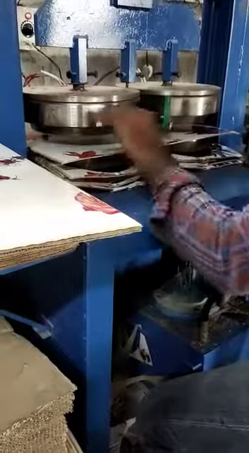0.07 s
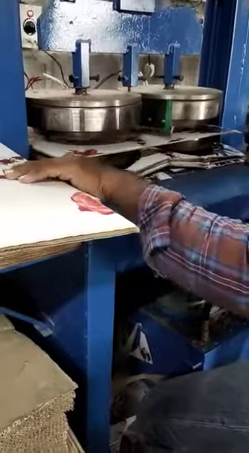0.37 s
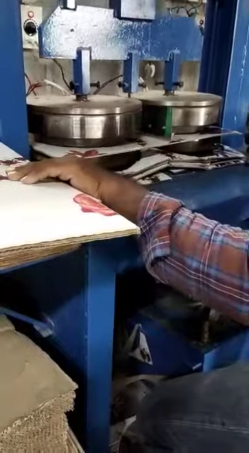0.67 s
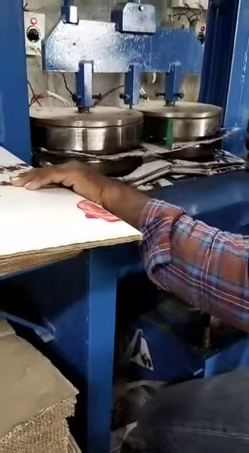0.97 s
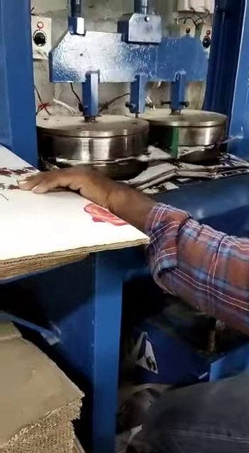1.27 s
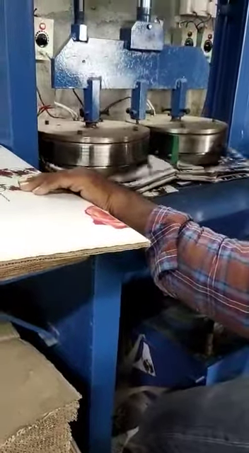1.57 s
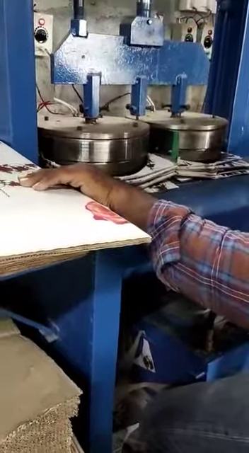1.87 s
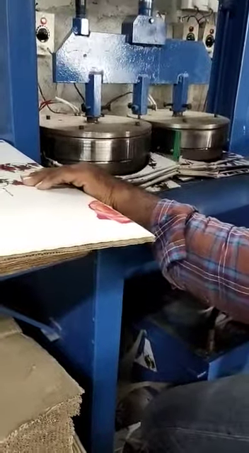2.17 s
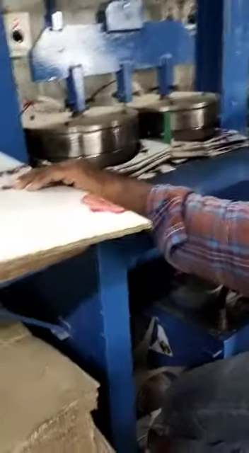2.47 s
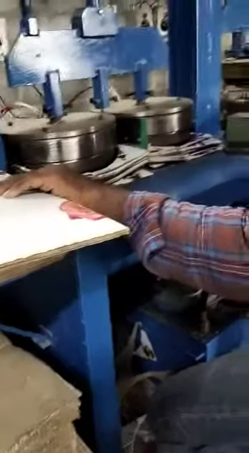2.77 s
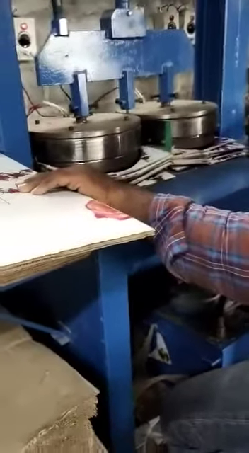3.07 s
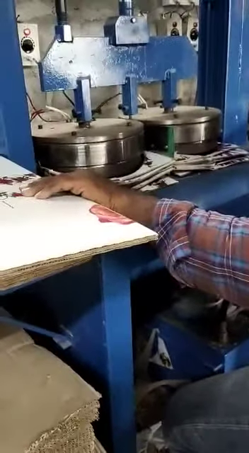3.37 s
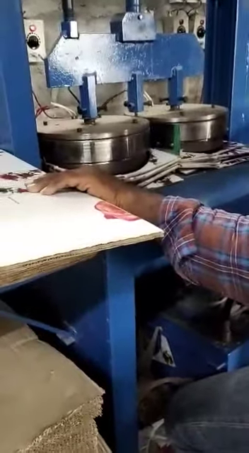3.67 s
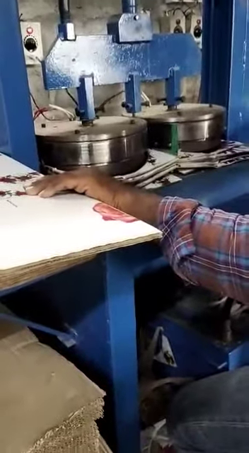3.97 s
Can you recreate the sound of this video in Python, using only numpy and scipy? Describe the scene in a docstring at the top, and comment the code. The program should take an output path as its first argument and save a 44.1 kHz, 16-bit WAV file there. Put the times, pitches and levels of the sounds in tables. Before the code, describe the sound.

A hydraulic press hums and whines close by in a small workshop. It starts with a soft knock and hissing oil, which stops with a faint chirp at 0.8 seconds. Paper crackles and crunches, with a thin squeak around 1.1 seconds. At about 1.5 seconds the steel dies close in a loud, rattling, ringing clunk. The pump dips, then hums on more quietly, with one sharp tick near 2.5 seconds.

```python
"""A small workshop with a hydraulic paper-plate press. The vane pump hums and whines at harmonics
of its shaft rate. The valve opens with a soft knock, oil sings through it while the ram descends,
and it shuts with a chirp. The dies crush the paper with crackles and a thin stick-slip squeak.
The press bottoms out in a rattling clunk that rings the frame's modes and drags the motor down;
the pump runs on more quietly, and one sharp tick follows."""
import sys
import numpy as np
from scipy import signal
from scipy.fft import irfft
from scipy.io import wavfile

SR = 44100
rng = np.random.default_rng(int(sys.argv[2]) if len(sys.argv) > 2 else 0)


def store_pcm(level_fs):
    """Save levels as 16-bit WAV."""
    pcm = np.round(np.clip(level_fs, -1, 1) * 32767).astype(np.int16)
    wavfile.write(sys.argv[1], SR, np.atleast_2d(pcm).T)


N = 176400
T = np.arange(N) / SR
VANES = 8  # pump pulses per turn of the shaft
COHERENT_BELOW_HZ = 500

def from_db(db):
    """Amplitude grows tenfold for every 20 dB."""
    return 10 ** (np.asarray(db) / 20)

def unit_rms(x):
    """Normalisation to unit mean power."""
    return x / np.sqrt(np.mean(x ** 2) + 1e-20)

def curve(rows):
    """Linear interpolation between (time_s, value) points."""
    return np.interp(T, *np.transpose(rows))

def pan(db):
    """Interaural level difference: a positive balance favours the left ear."""
    return from_db(np.array([[.5], [-.5]]) * db)

def drift(rate, axis=T):
    """Random modulation: Gaussian values joined by lines, `rate` of them per unit of the axis."""
    knots = rng.standard_normal(4096)
    return np.interp(axis * rate, np.arange(len(knots)), knots)

def band(x, low_hz, high_hz):
    """Butterworth band-pass filtering."""
    edges_hz = [low_hz, min(high_hz, SR / 2 - 1000)]
    return signal.sosfilt(signal.butter(2, edges_hz, "band", fs=SR, output="sos"), x + 1e-18)

def stereo_noise(hz, size=N):
    """Interaural coherence: the ears receive alike noise in the bass, unrelated noise in the treble."""
    coherence = 1 / (1 + (hz / COHERENT_BELOW_HZ) ** 2)
    common = np.sqrt(coherence) * rng.standard_normal(size)
    return common + np.sqrt(1 - coherence) * rng.standard_normal((2, size))

def shaped_noise(spectrum, ripple_db=2, ripple_spacing_hz=44.83):
    """Spectral shaping: noise of unit rms, coloured by narrow resonances of the steelwork."""
    hz = np.maximum(np.fft.rfftfreq(N, 1 / SR), 1)
    points_hz, density_db, balance_db = np.transpose(spectrum)
    white = stereo_noise(hz, len(hz)) + 1j * stereo_noise(hz, len(hz))
    ripple = ripple_db * drift(1 / ripple_spacing_hz, hz) * np.minimum(hz / 2500, 1)
    gain = from_db(np.interp(np.log(hz), np.log(points_hz), density_db) + ripple)
    sides = pan(np.interp(np.log(hz), np.log(points_hz), balance_db))
    bass_rolloff = np.minimum(hz / points_hz[0], 1)
    return unit_rms(irfft(white * gain * sides * bass_rolloff, N))

def impulses(times_s, levels_db):
    """Impulsive excitation: one sample per event."""
    out = np.zeros(N)
    out[(np.asarray(times_s) * SR).astype(int)] = from_db(levels_db)
    return out

def harmonics(angle, rows, waver_db, waver_per_s, lead_rad):
    """Wavering shaft harmonics, each multiple rounded to a whole number; the left ear leads in phase."""
    out = 0
    for multiple, db, balance_db in rows:
        amplitude = np.sqrt(2) * from_db(db + waver_db * drift(waver_per_s)) * pan(balance_db)
        lead = np.array([[lead_rad], [0]]) * min(multiple / VANES / 4, 1)
        out = out + amplitude * np.sin(np.round(multiple) * angle + rng.uniform(0, 2 * np.pi) + lead)
    return out

# Spectrum of the room: frequency_hz, relative_density_db, balance_db
ROOM_SPECTRUM = [(30, -22, 0), (62, -14, 0), (100, -2, 0), (240, 0, 0), (500, -2, 1), (900, -7, 0),
                 (1500, -8, -1), (2300, -8, 0), (4200, -16, 0), (6500, -13, 0), (7900, -9, -3),
                 (9500, -18, 0), (12000, -28, 10), (15000, -42, 10)]
def workshop():
    """Ambient noise: a broadband rumble and hiss whose level wavers slightly."""
    return from_db(-43 + 1.8 * drift(11)) * shaped_noise(ROOM_SPECTRUM)

# Vane-passing frequency, sagging at the clunk: time_s, pitch_hz
VANE_RATE = [(0, 198.95), (.9, 199), (1.4, 198.7), (1.53, 197.7), (1.65, 194), (1.73, 194.5), (1.86, 199),
             (2.2, 199.2), (4, 199.27)]
def shaft_angle():
    """Phase is the integral of frequency: the shaft's angle in radians as the motor slows under load."""
    vane_hz = curve(VANE_RATE) * (1 + 0.00043 * drift(25.4))
    return 2 * np.pi * np.cumsum(vane_hz) / VANES / SR

# Envelope of the hum's fundamental: time_s, level_db
HUM_ENVELOPE = [(0, -21.5), (.2, -20), (.92, -20), (1.1, -16.8), (1.17, -17.3), (1.24, -19.5), (1.33, -17),
                (1.53, -18.5), (1.6, -26.5), (1.8, -30), (2.08, -24.3), (2.4, -25.5), (4, -24.7)]
# Other partials of the hum: shaft_multiple, level_db, balance_db
HUM_PARTIALS = [(4, -66.5, -3), (12.06, -55, -1), (16.09, -41.5, -1), (24, -53.5, 9.5), (32.2, -64, -21),
                (40.2, -59.5, -2), (48, -66.5, -24), (55.32, -63.5, 14), (62.8, -62.5, -5), (75, -82, -6)]
def pump_hum(angle):
    """Periodic forcing: one pressure pulse per vane sets the fundamental."""
    fundamental = np.sqrt(2) * from_db(curve(HUM_ENVELOPE) + 0.18 * drift(59)) * np.sin(VANES * angle)
    return fundamental + harmonics(angle, HUM_PARTIALS, waver_db=0.76, waver_per_s=13, lead_rad=0.49)

# Envelope of the whine and hiss: time_s, gain_db
WHINE_ENVELOPE = [(0, 8.5), (1.0, 9.5), (1.5, 8), (1.62, 3), (1.8, 1.5), (2.05, 3), (2.55, 3), (2.85, -1.5),
                  (4, 0)]
# Partials of the pump casing: shaft_multiple
CASING_MULTIPLES = [90, 94, 96, 97, 102, 104, 127, 261, 281]
# Strength of each of those partials: relative_level_db
CASING_LEVELS = [-62.5, -64, -52, -63.5, -63, -57, -67.5, -64.5, -68]
# Spectrum of the pump's hiss: frequency_hz, relative_density_db, balance_db
HISS_SPECTRUM = [(1110, -5, -2), (1960, -3.5, 9), (2420, 1, 8), (3170, -8.5, 6), (4700, -29, 0),
                 (7300, -13.5, 14), (9200, -16, 5), (11400, -36, 43), (14300, -35, -2.5)]
# Spectrum of its high fizz: frequency_hz, relative_density_db, balance_db
FIZZ_SPECTRUM = [(3550, -38, 3.4), (5120, -22, 9.9), (5770, -6.5, 35), (5920, 3, 18), (6160, -6.5, 19),
                 (6300, -0.5, 25), (6720, -6.5, 14), (6945, 5, 27), (7080, -15, 6.5), (9100, -26, 9.3),
                 (12300, -25.5, 40), (13000, -51.5, 9.9)]
def pump_whine(angle):
    """Forced vibration: the casing sounds high harmonics while the rotation modulates hiss and fizz."""
    envelope_db = curve(WHINE_ENVELOPE)
    partials = [(multiple, db, 11) for multiple, db in zip(CASING_MULTIPLES, CASING_LEVELS)]  # leftward
    casing = harmonics(angle, partials, waver_db=1.05, waver_per_s=9.3, lead_rad=1.0)
    pulsing = 1 + .33 * np.cos(VANES * angle) + .1 * np.cos(angle)
    hiss = from_db(-50) * shaped_noise(HISS_SPECTRUM) * pulsing
    flutter = 1 + 0.12 * np.cos(2 * angle) + 0.14 * np.cos(7 * angle)
    fizz = from_db(-46.5 + 0.41 * envelope_db) * shaped_noise(FIZZ_SPECTRUM) * flutter
    return from_db(envelope_db) * (casing + hiss) + fizz

# Knock of the opening valve: peak_s, width_s, low_hz, high_hz, level_db
VALVE_KNOCK = (.033, 0.09, 780, 1450, -32)
def valve_knock():
    """A band-limited transient: the valve opens with a soft, dull burst of noise that quickly fades."""
    peak_s, width_s, low_hz, high_hz, db = VALVE_KNOCK
    envelope = from_db(db) * np.exp(-((T - peak_s) / width_s) ** 2)
    return envelope * unit_rms(band(stereo_noise(low_hz), low_hz, high_hz))

# Spectrum of the rushing oil: frequency_hz, relative_density_db, balance_db
OIL_SPECTRUM = [(100, -8, 0), (300, -2, 3), (795, -8.5, 23), (1600, 1.5, 4), (2170, -2, 7),
                (3140, -1, -1.5), (4950, 0, 0), (6040, -2.5, 13), (8100, 2, -4), (10300, -8.5, 7),
                (13000, -13.5, 8), (15500, -20, -5)]
# Tones of the oil in the valve: shaft_multiple, level_db, balance_db
OIL_PARTIALS = [(32, -49, -3), (40.05, -40, -5), (48, -47.5, -13), (56.54, -38, -9), (64.6, -49, 0),
                (81.5, -50, 0), (111.7, -45.5, 5.5), (144, -50.5, 4), (160.4, -53, 4), (225, -50, 2)]
# Brief whistle early in the stroke: shaft_multiple, level_db, balance_db
OIL_WHISTLE = [(112, -38.5, 4)]
def valve_flow(angle, opens_s=0.0067, shuts_s=0.826, fade_s=0.046, whistle_s=.18, whistle_width_s=0.12):
    """Flow noise: oil rushes and sings in time with the pump while the ram descends."""
    opening = np.clip((T - opens_s) / fade_s, 0, 1)
    flowing = np.clip(1 - (T - shuts_s) / fade_s, 0, 1)
    rush = from_db(-34.5) * shaped_noise(OIL_SPECTRUM) * (1 + 0.089 * np.cos(VANES * angle))
    singing = harmonics(angle, OIL_PARTIALS, waver_db=2.7, waver_per_s=21.8, lead_rad=1.64)
    whistle = harmonics(angle, OIL_WHISTLE, waver_db=1.5, waver_per_s=33.4, lead_rad=.7)
    swell = np.exp(-((T - whistle_s) / whistle_width_s) ** 2)
    return flowing * (rush + opening * singing + swell * whistle)

# Spectrum of the crushed paper: frequency_hz, relative_density_db, balance_db
CRUNCH_SPECTRUM = [(40, -15, 0), (200, 0, 0), (330, 1.5, 0), (510, 3, 0), (650, -10.5, 0), (1500, -15, 0),
                   (2800, -13.5, 0.48), (4600, -22.5, 0.22), (8100, -14, 0.64), (10900, -22, 1),
                   (15000, -28, 2)]
# Single snaps of the paper: start_s, relative_level_db
PAPER_SNAPS = [(.8855, -21), (1.0543, -17), (1.066, -16.5), (1.167, -18.5), (1.2095, -16.5),
               (1.4203, -21.5), (1.478, -24), (1.519, -23)]
def paper(crunch_s=1.19, crunch_width_s=0.061, crackle_s=0.92, crackle_width_s=0.33, peak_per_s=300):
    """Buckling: sheets fold between the dies with Poisson crackle, a few snaps and a swelling crunch."""
    swell = np.exp(-abs(T - crunch_s) / crunch_width_s)
    crunch = from_db(-27.5 + 2.8 * drift(130)) * swell * shaped_noise(CRUNCH_SPECTRUM)
    crackles_per_s = peak_per_s * np.exp(-((T - crackle_s) / crackle_width_s) ** 2)
    buckles = rng.random(N) < crackles_per_s / SR
    strengths = from_db(-33.5 + 2.3 * np.minimum(rng.exponential(1, N), 3))
    cracks = buckles * strengths + impulses(*np.transpose(PAPER_SNAPS))
    t = T[:SR // 10]
    decay = np.exp(-t / 0.0011) + 0.14 * np.exp(-t / 0.045)
    response = band(rng.standard_normal((2, len(t))), 5700, 10300) * decay
    return crunch + signal.fftconvolve(cracks[None], response)[:, :N] * pan(2.9)

def stick_slip(rows, waver_hz, waver_per_s):
    """Friction-driven oscillation: short tones, unsteady in pitch and level."""
    out = 0
    for start_s, length_s, hz, db in rows:
        swell = np.sqrt(np.sin(np.pi * np.clip((T - start_s) / length_s, 0, 1)).clip(0))
        amplitude = from_db(db + 2.2 * drift(waver_per_s)) * swell
        pitch_hz = hz + waver_hz * drift(waver_per_s)
        out = out + amplitude * np.sin(2 * np.pi * np.cumsum(pitch_hz) / SR)
    return out

# Chirps of the closing valve: start_s, length_s, pitch_hz, level_db
VALVE_CHIRPS = [(.818, .024, 800, -42), (.836, .038, 1005, -40)]
def valve_chirps():
    """Stick-slip friction: the valve chirps twice as it shuts."""
    return stick_slip(VALVE_CHIRPS, waver_hz=22, waver_per_s=260)

# Squeaks of the die: start_s, length_s, pitch_hz, level_db
DIE_SQUEAKS = [(.974, .014, 12000, -41), (1.097, .016, 12160, -26.5), (1.112, 0.022, 12000, -28.5),
               (1.13, .05, 12020, -41.5)]
def die_squeaks():
    """Stick-slip friction: the sliding die squeaks thinly on the left."""
    return stick_slip(DIE_SQUEAKS, waver_hz=110, waver_per_s=450) * pan(15)

def ring_envelope(blows, hz, t60_s, crack, crack_s, build_cycles=0.81):
    """Incoherent addition: each blow builds up, cracks and decays, and their energies sum."""
    t = T[:SR]
    build_up = 1 - np.exp(-t * hz / build_cycles)
    one_blow = from_db(-60 * t / t60_s) * build_up * (1 + crack * np.exp(-t / crack_s))
    energy = np.zeros(N)
    for start_s, db in blows:
        energy[int(start_s * SR):][:SR] += (from_db(db) * one_blow) ** 2
    return np.sqrt(energy)

def dense_modes(blows, rows, crack, crack_s, edge_ratio=1.243):
    """Modal overlap: modes too close to tell apart ring as bands of decaying noise."""
    out = 0
    for hz, db, t60_s in rows:
        noise = unit_rms(band(stereo_noise(hz), hz / edge_ratio, hz * edge_ratio))
        out = out + from_db(db) * noise * ring_envelope(blows, hz, t60_s, crack, crack_s)
    return out

# Noise bands of the first contact: low_hz, high_hz, level_db, t60_s
CLANK_BANDS = [(1720, 2160, -12, 0.086), (700, 1300, -18, 0.046)]
def clank(start_s, rise_s=.0006):
    """Hard impact: steel meets steel in a brief, quickly damped crack."""
    age_s = np.maximum(T - start_s, 0)
    out = 0
    for low_hz, high_hz, db, t60_s in CLANK_BANDS:
        noise = band(band(stereo_noise(low_hz / 2), low_hz, high_hz), low_hz, high_hz)
        out = out + from_db(db - 60 * age_s / t60_s) * unit_rms(noise)
    return out * np.minimum(age_s / rise_s, 1) * pan(2.5)

# Blows as the press bottoms out: start_s, frame_gain_db, die_gain_db
PRESS_BLOWS = [(1.5473, 0, -0.5), (1.561, -4.5, 0.5), (1.569, -7, -13), (1.584, -2.5, -4), (1.597, -8, -10),
               (1.61, -15, -23), (1.684, -18.5, -15), (1.724, -19, -13)]
# Distinct modes of the frame: pitch_hz, relative_level_db, t60_s
FRAME_MODES = [(246, 0.5, 0.75), (287, -8.5, 1), (329, -1.5, 0.82), (384.5, -9, 0.47), (437, -15, .8),
               (492.6, -3, 0.84), (569.5, -5, 0.73), (705, -11.5, 0.81), (745, -2.5, 0.42),
               (891, -2.5, 0.27), (955, -1.5, 0.26), (1165, -11, .34), (1750, -8, 0.32)]
# Dense modes of the frame: centre_hz, level_db, t60_s
FRAME_BANDS = [(121, -41, 2.2), (190, -30.5, .8), (306, -23.5, 1), (503, -23, 0.78), (783, -18.5, 0.37),
               (1160, -21.5, .28), (1890, -17.5, .25)]
# Dense modes of the steel dies: centre_hz, level_db, t60_s
DIE_BANDS = [(3100, -29.5, 0.29), (4630, -34.5, 0.3), (7570, -24.5, 0.25), (11500, -37.5, 0.4)]
def clunk(bass_cut_hz=96):
    """Damped free vibration: a quick run of blows rings the heavy frame and rattles the dies."""
    on_frame = [(start_s, db) for start_s, db, _ in PRESS_BLOWS]
    on_dies = [(start_s, db) for start_s, _, db in PRESS_BLOWS]
    frame = 0
    for hz, db, t60_s in FRAME_MODES:
        envelope = from_db(db - 22) * ring_envelope(on_frame, hz, t60_s, crack=0.57, crack_s=0.016)
        ear_phases = rng.normal(0, 1, (2, 1)) * min(hz / COHERENT_BELOW_HZ, 2)
        frame = frame + envelope * np.sin(2 * np.pi * hz * T + ear_phases)
    frame += dense_modes(on_frame, FRAME_BANDS, crack=0.99, crack_s=0.0057) * pan(.4)
    contact = clank(start_s=PRESS_BLOWS[0][0])
    dies = dense_modes(on_dies, DIE_BANDS, crack=0.66, crack_s=.003) * pan(2.5)
    high_pass = signal.butter(2, bass_cut_hz, "high", fs=SR, output="sos")
    return signal.sosfilt(high_pass, contact + frame + dies)

def tick(start_s=2.4655):
    """A band-limited impulse: one dry, bright tick close by on the left."""
    click = band(impulses([start_s], levels_db=[-2]), 5000, 8900)
    return band(click, 2500, 12500) * pan(24)

def scene():
    """Superposition: the sources add, with pump and oil locked to the same shaft."""
    angle = shaft_angle()
    hydraulics = pump_hum(angle) + pump_whine(angle) + valve_flow(angle)
    stroke = paper() + die_squeaks() + valve_chirps() + clunk()
    return hydraulics + stroke + tick() + workshop() + valve_knock()

def record(dry, ceiling=.9, stopband_hz=16200):
    """Soft saturation rounds the peaks; a steep low-pass removes the highest treble."""
    rounded = dry / (1 + (dry / ceiling) ** 4) ** (1 / 4)
    return signal.sosfilt(signal.cheby2(14, 70, stopband_hz, fs=SR, output="sos"), rounded)

dry = scene()
out = record(dry)
store_pcm(out)
```